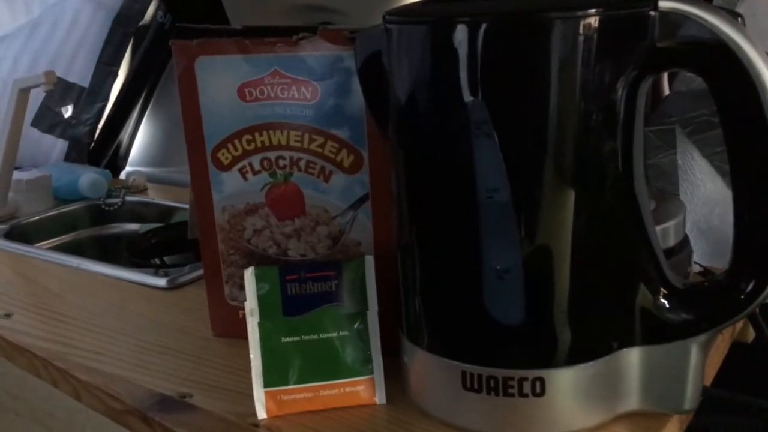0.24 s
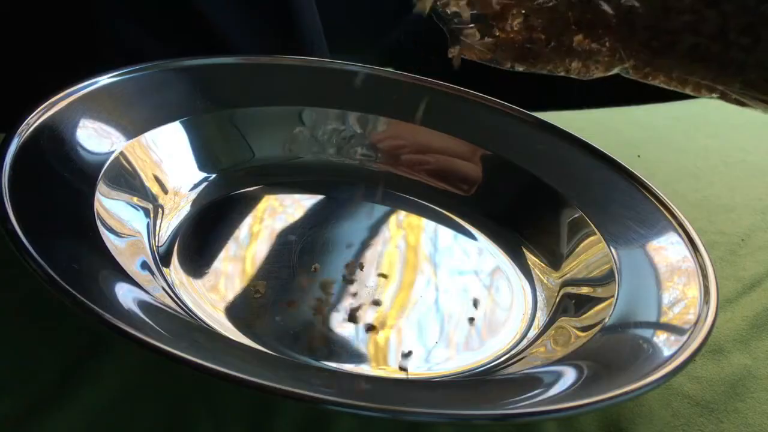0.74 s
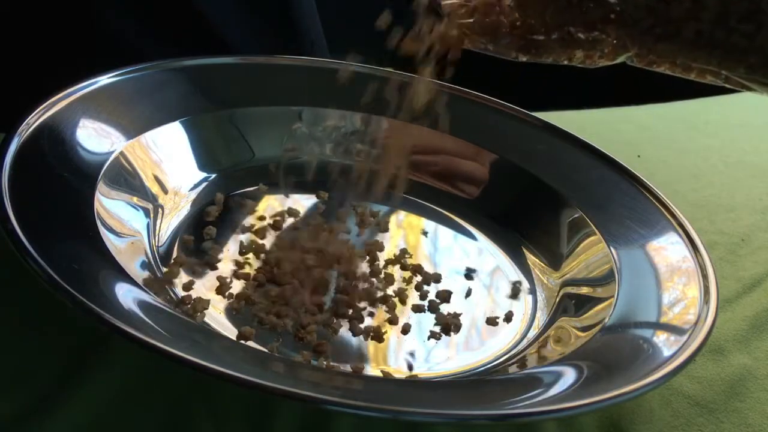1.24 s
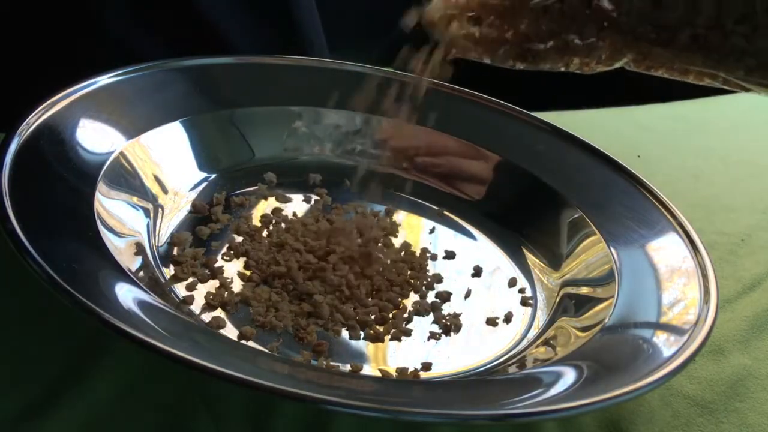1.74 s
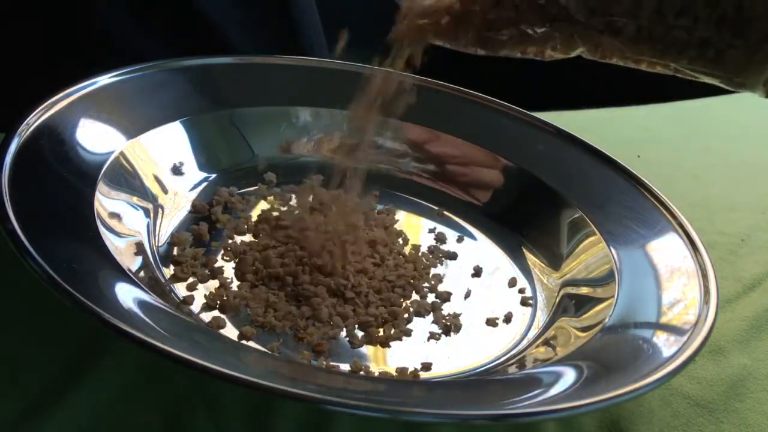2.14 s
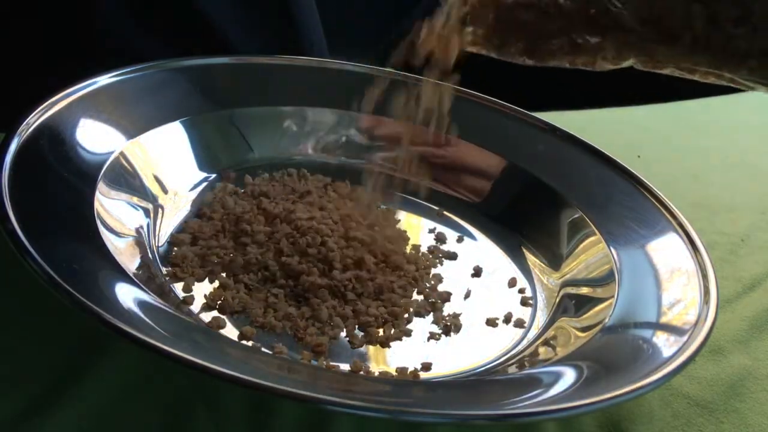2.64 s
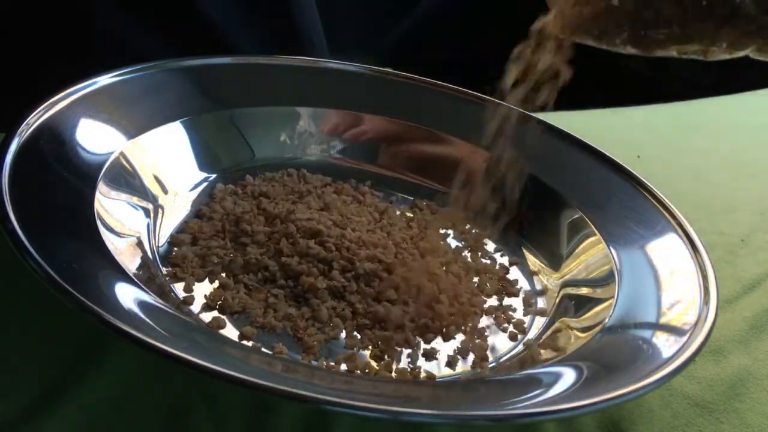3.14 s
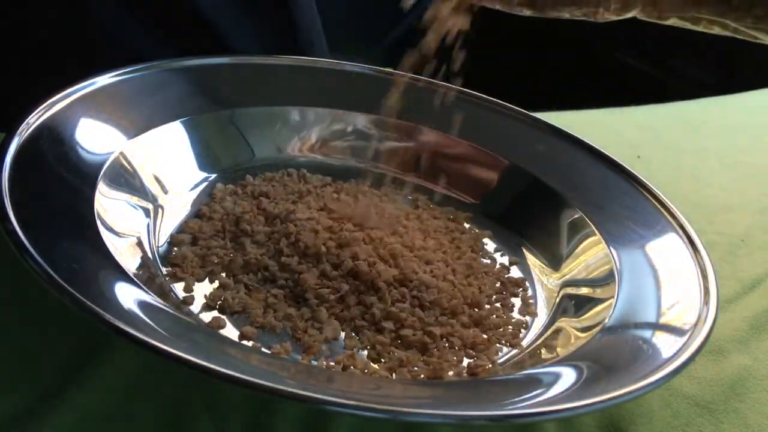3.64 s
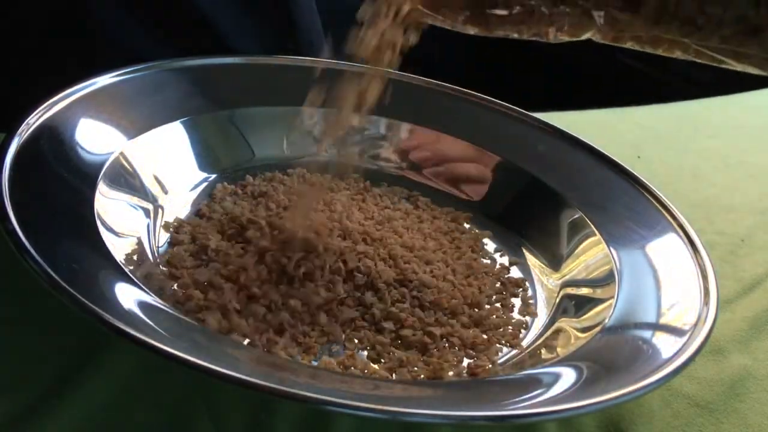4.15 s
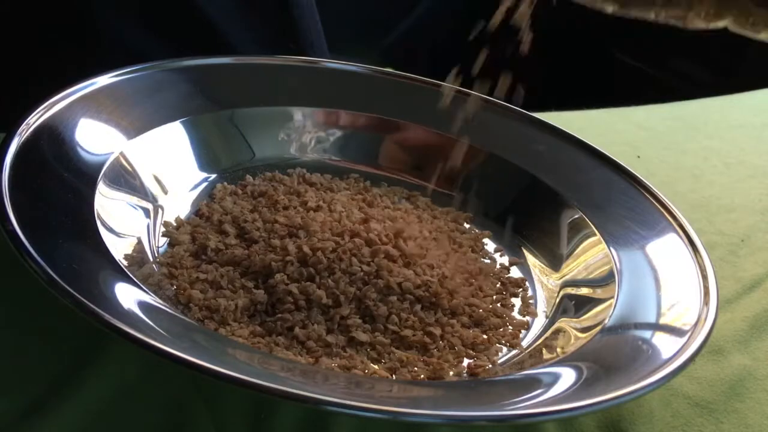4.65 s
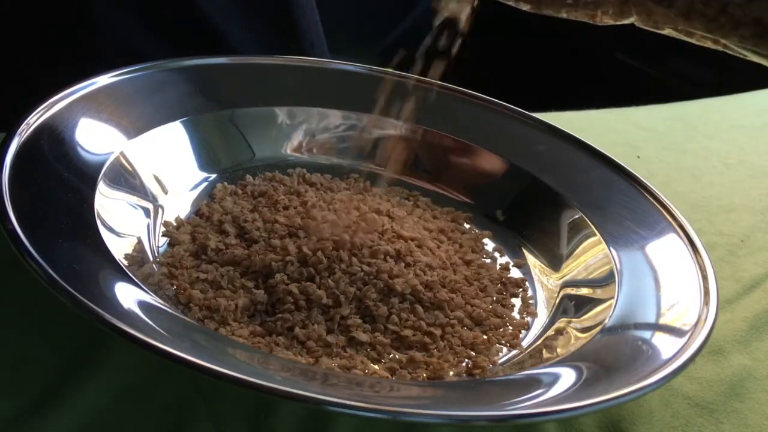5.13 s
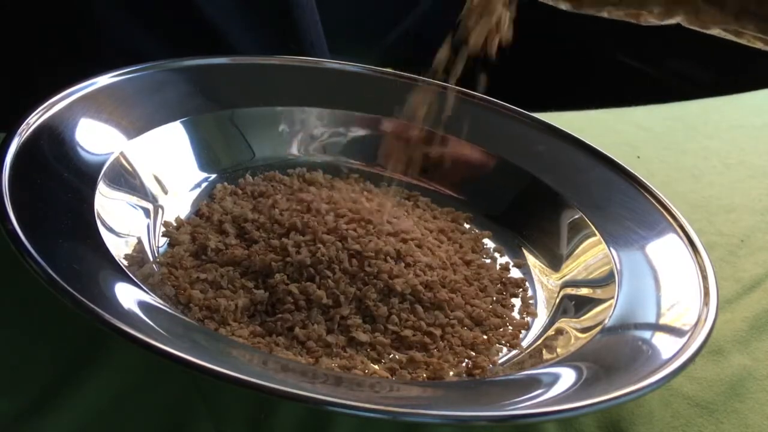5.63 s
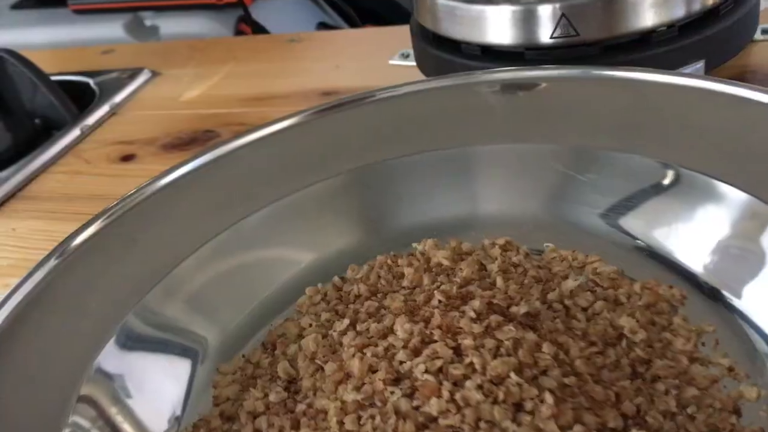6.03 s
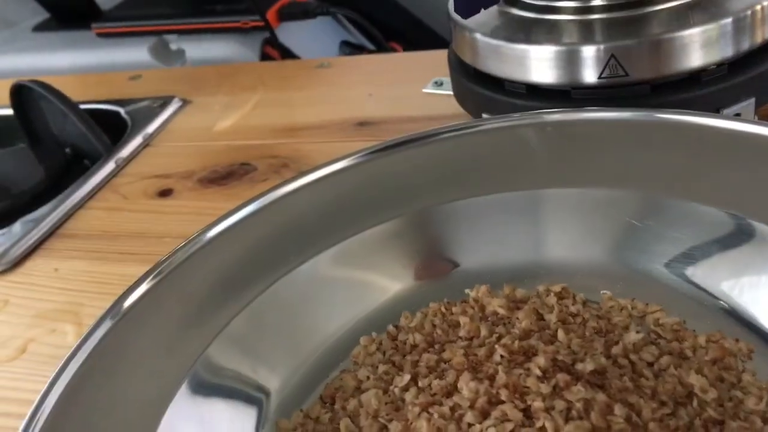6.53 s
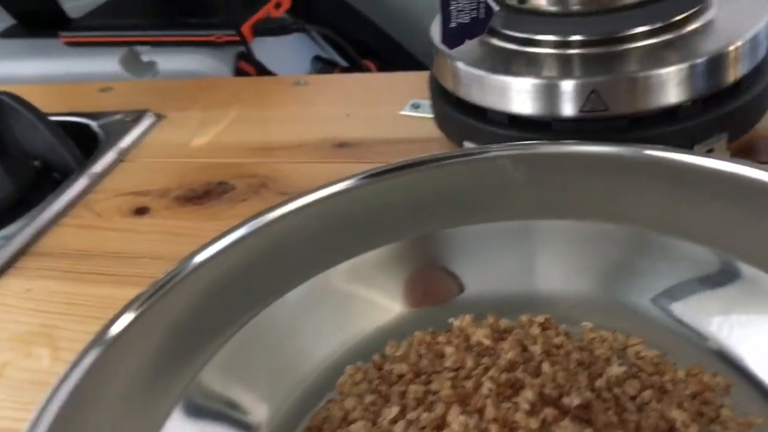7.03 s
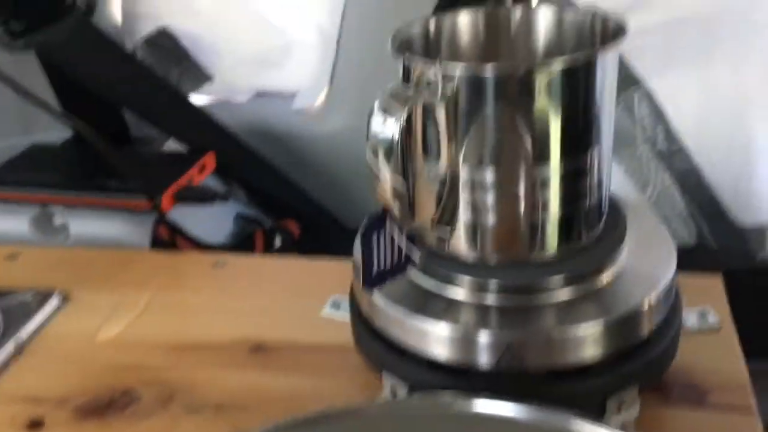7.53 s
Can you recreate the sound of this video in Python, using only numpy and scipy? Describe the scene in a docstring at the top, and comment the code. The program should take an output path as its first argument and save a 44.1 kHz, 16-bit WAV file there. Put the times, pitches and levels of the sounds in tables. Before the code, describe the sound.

In a small cramped room, an electric kettle rumbles low for under a second. A hard cut brings dry flakes pouring from a crackling plastic bag, close to the microphone: bright, tinny ringing on bare steel at first, then a duller patter as the heap grows, uneven and clumpy, thinning towards the end. Another cut leaves a faint hush with a few soft knocks and clicks on a wooden worktop.

```python
"""Buckwheat flakes in a camper galley

Three shots in a small galley, split by cuts. An electric kettle rumbles on the wooden worktop: coloured noise,
ringing body modes and a wavering drone. Flakes pour from a crackling plastic bag onto a steel plate: dense
random grains patter on the heap and ring the plate's modes until the heap covers it. Then the room is quiet
but for light handling knocks and clicks: noise bursts over decaying wood and board modes."""
import sys
import numpy as np
from scipy import signal
from scipy.fft import rfft, irfft
from scipy.io import wavfile
from scipy.ndimage import uniform_filter1d

SR = 44100
rng = np.random.default_rng(int(sys.argv[2]) if len(sys.argv) > 2 else 0)


def store_wav(level_fs):
    """Save 16-bit WAV to argv[1]."""
    pcm = np.round(np.clip(np.atleast_2d(level_fs), -1, 1) * 32767)
    wavfile.write(sys.argv[1], SR, pcm.T.astype(np.int16))


N = 343098
TIME = np.arange(N) / SR
RING_TIME = TIME[:SR // 4]
# where the shots begin and end (s)
KETTLE_END, POUR_START, POUR_END = 0.709, 0.742, 6.007


# how freely the flakes run from the bag, as the nominal level of their patter: time_s, level_db
FLOW = [(.74, -59), (.76, -44.5), (1.2, -40), (1.56, -44), (2.07, -42), (2.66, -44.5), (2.79, -41.5),
        (3.6, -46.5), (3.65, -52), (3.745, -43.5), (4.03, -46), (4.1, -42.5), (4.66, -51.5), (4.97, -51.5),
        (5.19, -46), (5.47, -53.5), (5.66, -50.5), (6.0, -55)]
# share of the stream that lands on bare steel as heap and hand move: time_s, share (0-1)
BARE_STEEL = [(.76, .72), (1.5, .96), (1.8, .3), (2.5, .44), (3.22, .44), (3.7, .08), (4.28, .21),
              (4.71, .01), (6.0, .1)]
# colour of flakes on the heap: pitch_hz, relative level_db (per Hz)
PATTER_COLOUR = [(200, -19.5), (370, -9), (470, -10), (570, -7), (690, -3.5), (890, -7.5), (1050, -2.5),
                 (1300, -5.5), (1820, -6.5), (2080, -1.5), (2680, 0), (3650, -2), (4290, -4.5),
                 (4900, -10.5), (6400, -33.5)]
# colour of their bright ticks on the heap: pitch_hz, relative level_db (per Hz)
TICK_COLOUR = [(4900, -13), (5500, -2), (6400, 0), (7400, -3), (8600, -1), (10400, -4), (12400, -1),
               (14000, 1), (15700, -2.5)]
# low notes of the whole dish flexing: pitch_hz, t60_s, level_db (over the push of the flakes)
DISH_MODES = [(328, 0.07, -21), (720, 0.03, -14.5)]
# flakes per s at a flow of FULL_FLOW_DB; the count doubles with every DOUBLING_DB
FLAKES_PER_S, FULL_FLOW_DB, DOUBLING_DB = 2900, -43, 21.5
# ticking over patter on the heap, and what a fully bare plate adds to it
TICK_DB, STEEL_TICK_DB = 1.74, 7.5
STREAM_FLUTTER_DB = 1.5  # quick random unevenness of the stream
SKITTER_BARE = 0.48  # from this share of bare steel on, a clump only skitters and adds no patter


def flakes():
    """Flakes land in clumps: on the heap they patter and tick dryly, on bare steel they ring the plate."""
    flow_db, = curves(FLOW)
    bare, = curves(BARE_STEEL)
    swell_db = clumps()
    rate = FLAKES_PER_S * 2 ** ((flow_db - FULL_FLOW_DB) / DOUBLING_DB)
    stream = undb(STREAM_FLUTTER_DB * walk(55))
    landing = impacts(rate, scatter_db=6.0, contact_s=0.0014)

    def grains(low_hz, high_hz, contact_s):
        """Whole flakes sound at every pitch; rebounds and crumbs only at the pitch of their own size."""
        own = impacts(rate / 2, scatter_db=6.0, contact_s=contact_s)
        envelope = stream * np.hypot(0.7 * landing, 0.69 * own)
        return band(envelope * rng.standard_normal(N), low_hz, high_hz)

    patter = undb(flow_db + swell_db * np.maximum(1 - bare / SKITTER_BARE, 0))
    tick = undb(flow_db + swell_db + TICK_DB + STEEL_TICK_DB * bare)

    coarse = grains(100, 1580, contact_s=0.0019) + grains(1460, 7000, contact_s=0.0022)
    fine = grains(4500, 9460, contact_s=0.0005) + grains(9500, 19000, contact_s=0.00045)
    heap = through(coarse * patter, colour(PATTER_COLOUR))
    heap += through(fine * tick * np.sqrt(1 - bare), colour(TICK_COLOUR))

    poured = np.cumsum(undb(flow_db) ** 2 * shot(POUR_START, POUR_END))
    heap_size = poured / poured[-1]
    # each landing spot wakes other modes of the steel
    steel_level = tick * np.sqrt(bare)
    blows = grains(1300, 19000, contact_s=0.00036) * steel_level
    other_blows = grains(1300, 19000, contact_s=0.00036) * steel_level
    steel = plate(blows, other_blows, heap_size)

    push = grains(150, 1500, contact_s=0.001) * patter * bare
    dish = sum(undb(db) * through(push, mode(hz, t60)) for hz, t60, db in DISH_MODES)
    return heap + steel + dish


# clumps that slide out of the bag together: start_s, length_s, jump_db
CLUMPS = [(.778, 0.025, 10), (0.822, .01, 8.5), (.855, 0.01, 5), (0.935, 0.063, 5), (1.022, 0.046, 6),
          (1.126, .086, 5), (1.299, 0.1, 3.5), (1.572, 0.021, 5), (1.858, 0.014, 4.5), (2.011, 0.03, 4),
          (2.155, .04, 5.5), (2.366, 0.012, 7), (2.773, .05, 1), (2.923, 0.03, 7.5), (3.126, 0.047, 2.5),
          (3.23, 0.027, 5), (3.324, .025, 4.5), (3.523, 0.059, 3.5), (3.743, 0.037, 4.5), (4.117, .041, 4),
          (4.273, 0.078, 4.5), (4.42, 0.018, 4.5), (4.7, 0.054, 4), (4.771, 0.023, 8.5),
          (4.984, 0.019, 4.5), (5.129, 0.031, 7), (5.271, 0.038, 5.5), (5.372, 0.041, 4.5),
          (5.815, 0.053, 4.5), (5.932, .035, 5.5)]


def clumps():
    """Swell of the stream in dB: each clump arrives quickly, runs for its length and trickles out."""
    swell_db = np.zeros(N)
    for start, length, db in CLUMPS:
        attack = np.clip((TIME - start) / 0.0054, 0, 1)  # rise time in s
        release = np.exp(-np.clip((TIME - start - length) / 0.016, 0, 20))  # time constant in s
        swell_db += db * attack * release
    return swell_db


def impacts(rate, scatter_db, contact_s):
    """Envelope of many tiny impacts of unequal size, each dying away as contact ends; mean power near 1."""
    hit = rng.random(N) < rate / SR
    size_db = scatter_db * np.minimum(rng.standard_normal(N), 3)
    energy = hit * undb(size_db) ** 2
    power = signal.lfilter([1], [1, -np.exp(-2 / (contact_s * SR))], energy)
    return np.sqrt(power / (uniform_filter1d(power, SR // 14) + 1e-12))


# strong modes of the steel plate: pitch_hz, relative level_db
PLATE_MODES = [(2046, -11), (2638, -13), (2848, -12), (2929, -10), (3311, -11), (3639, -11), (3747, -11),
               (4048, -16), (4737, -18), (5529, -12), (5636, -8), (5706, -7), (5787, -12), (6422, -10),
               (6966, -7), (7305, -5), (7375, -8), (7440, -7), (7666, -6), (8263, -7), (8328, -4),
               (8952, -6), (9663, -9), (9744, -6), (10810, -2), (11493, -4), (13194, -2), (13259, -2),
               (14400, 0), (15655, -4)]
# colour of its countless weaker modes: pitch_hz, relative level_db (per Hz)
WEAK_COLOUR = [(2000, -28), (3800, -28), (5100, -22), (6200, -18), (7200, -10), (8600, 0.5),
               (10200, -5.5), (12300, 6.5), (13800, 2), (15700, -3.5)]
# share of the lower ring that the full heap takes away, and below which pitch
HEAP_DAMPING, HEAP_DAMP_HZ = 0.59, 8500


def plate(blows, other_blows, heap_size):
    """Thin steel rings in strong modes, weaker ones filling the gaps; the heap muffles the lower ones."""
    strong = sum(undb(db) * mode(hz, t60=0.085) * rng.choice([-1, 1]) for hz, db in PLATE_MODES)
    weak = through(burst(t60=0.021), colour(WEAK_COLOUR))
    ring = undb(-2.5) * through(blows, strong) + undb(-0.5) * through(other_blows, weak)
    lower = signal.sosfiltfilt(signal.butter(2, HEAP_DAMP_HZ, fs=SR, output="sos"), ring)
    return ring - HEAP_DAMPING * heap_size * lower


# the bag snaps: start_s, crack level_db, pitch_hz of the buckling film, pop level_db
SNAPS = [(0.7641, -32, 1510, -33.5), (1.3135, -23, 1890, -32), (1.4834, -19, 2670, -53),
         (1.9807, -37, 2040, -43), (2.0201, -21.5, 2000, -43), (2.0547, -23, 1800, -22.5),
         (2.1759, -28, 2670, -50), (2.5646, -22, 740, -22), (2.5978, -30, 2180, -56),
         (2.6918, -23.5, 1550, -30), (2.9073, -25.5, 1880, -54), (3.246, -27.5, 2160, -52),
         (3.7595, -24.5, 2210, -37), (3.9976, -31, 2550, -48), (4.1304, -21.5, 1500, -38),
         (4.6967, -28, 2480, -36), (4.8824, -22, 2500, -30.5), (5.0537, -37, 1920, -37.5),
         (5.1336, -32, 2730, -55), (5.8492, -38.5, 2780, -39.5)]


def bag():
    """Creases in the stiff film buckle: a sharp crack and a pop of a few cycles."""
    out = np.zeros(N)
    for start, crack_db, hz, pop_db in SNAPS:
        crack_hiss = band(burst(t60=0.0069), 6000, 17200)
        crack = unit(mode(hz=11800, t60=0.00057)) + undb(3.5) * unit(crack_hiss)
        pop_noise = band(burst(t60=0.011), hz * 0.4, hz * 2.4)
        pop = unit(mode(hz, t60=7 / hz)) + undb(3) * unit(pop_noise)
        add(out, start, blow(crack, crack_db, first_s=0.0017))
        add(out, start, blow(band(pop, 510, 4600), pop_db, first_s=0.00089))
    return out


# colour of the kettle's rumble: pitch_hz, relative level_db (per Hz)
RUMBLE_COLOUR = [(40, -7), (75, -1.5), (110, -10), (160, -10.5), (225, -12), (300, -19.5), (380, -34),
                 (900, -44), (1700, -46), (3500, -51.5), (5500, -59), (7200, -55.5), (10300, -61),
                 (12500, -59), (15500, -60)]
# course of the rumble, before a fixed 2.5 dB lift: time_s, level_db
RUMBLE_LEVEL = [(0, -43.5), (.14, -47), (.37, -43.5), (.7, -46)]
# the kettle's body, ringing faintly and steadily: pitch_hz, t60_s, level_db
BODY_MODES = [(547, 0.035, -80), (694, 0.028, -70.5), (860, 0.046, -73), (1045, .06, -81), (1465, .05, -76)]
# the worktop's drone, which swells with the rumble: pitch_hz, width_hz of its waver, mean level_db
DRONE = [(27.3, 2.1, -56), (55.2, 4.4, -40)]
DRONE_FLUTTER_DB = 1.7


def kettle():
    """Heating water rumbles and rings the kettle's body; the worktop drones with it at a wavering pitch."""
    level_db, = curves(RUMBLE_LEVEL)
    out = undb(level_db + 2.5) * noise(RUMBLE_COLOUR)
    body = sum(undb(db) * unit(mode(hz, t60)) for hz, t60, db in BODY_MODES)
    out += signal.fftconvolve(rng.standard_normal(N), body)[:N]
    swell_db = level_db - level_db[:SR // 2].mean()
    for hz, width, db in DRONE:
        phase = 2 * np.pi * np.cumsum(hz + width / 2 * walk(17)) / SR
        drone_db = db + swell_db + DRONE_FLUTTER_DB * walk(11.3)
        out += np.sqrt(2) * undb(drone_db) * np.sin(phase)
    return out


# handling knocks: start_s, thump pitch_hz, thump level_db, click level_db, hardness_db (treble over click)
KNOCKS = [(6.29, 217, -64.5, -85, -2), (6.4482, 140, -67, -77.5, 14), (6.4635, 150, -71, -63.5, 5.5),
          (6.62, 220, -56, -76.5, 9), (6.65, 230, -68, -63, -6), (6.693, 169, -58, -66.5, -6),
          (6.8396, 199, -55, -61, -18), (6.942, 207, -67, -81, -3), (7.0254, 190, -52.5, -61.5, -15),
          (7.176, 191, -53.5, -82, 4), (7.2147, 180, -34.5, -42.5, -0.5), (7.2416, 190, -47, -57, -6),
          (7.268, 129, -51, -54.5, -13), (7.283, 111, -49.5, -63, -11), (7.345, 186, -42, -68, -1),
          (7.366, 194, -48, -67, -8), (7.481, 136, -50.5, -72.5, -7), (7.505, 151, -54, -76, -5),
          (7.558, 135, -61, -76, 8)]
# colour of a knock's click: pitch_hz, relative level_db (per Hz)
CLICK_COLOUR = [(900, -18), (1320, 4.5), (1550, 0), (1780, 2), (2100, -4), (2600, -2.5), (2900, -4.5),
                (3500, -8.5), (5000, -14)]
# modes of the wooden worktop, before a random detuning: pitch_hz, relative level_db, t60_s
WOOD_MODES = [(345, -12.5, .06), (435, -10, 0.045), (547, -2.5, 0.033), (590, -8, 0.039), (732, -2, 0.039),
              (846, -3.5, 0.031), (990, -10, 0.033)]
# the clack lies midway between thump and click, plus CLACK_DB;
# it gains CLACK_GROWTH dB per dB of thump over a firm knock, so light knocks hardly wake it
CLACK_DB, CLACK_GROWTH, FIRM_KNOCK_DB = -2, 0.29, -50


def knocks():
    """Things touch the worktop: a click, a woody clack, then the slower thump of the board."""
    out = np.zeros(N)
    click_ring = colour(CLICK_COLOUR, size=1024)
    for start, hz, thump_db, click_db, hardness_db in KNOCKS:
        click = through(burst(t60=0.035), click_ring)
        treble = band(burst(t60=0.032), 4200, 16700)

        wood = np.zeros(len(RING_TIME))
        for wood_hz, db, t60 in WOOD_MODES:
            detuned_hz = wood_hz * (1 + 0.042 * rng.standard_normal())
            wood += undb(db) * mode(detuned_hz, t60) * rng.choice([-1, 1])
        wood_noise = band(burst(t60=0.063), 475, 900)
        clack = (unit(wood) + undb(-3.5) * unit(wood_noise)) * (1 - fade(t60=0.0059))
        clack_db = (thump_db + click_db) / 2 + CLACK_DB + CLACK_GROWTH * (thump_db - FIRM_KNOCK_DB)

        board = unit(mode(hz, t60=0.088)) + undb(-8) * unit(mode(hz=82.6, t60=0.23))
        board += undb(-4.5) * unit(band(burst(t60=0.18), 72, 282))
        # the heavy board takes a few cycles to get moving
        thump = band(board * (1 - fade(t60=0.02)), 35, 370)

        add(out, start, blow(thump, thump_db, first_s=0.037))
        add(out, start, blow(clack, clack_db, first_s=0.014))
        add(out, start, blow(click, click_db, first_s=0.014))
        add(out, start, blow(treble, click_db + hardness_db, first_s=0.013))
    return out


def cabin(x, wet_db, t60):
    """Direct sound at the microphone plus the short, dull reflections of a cramped room."""
    tail = unit(band(burst(t60), 300, 9100) * (RING_TIME > 0.003))
    return x + undb(wet_db) * through(x, tail)


def noise(points):
    """Steady noise of a given colour, rms 1."""
    return through(rng.standard_normal(N + SR), colour(points))[SR:]


def undb(db):
    """Decibels to gain."""
    return 10 ** (np.asarray(db) / 20)


def curves(table):
    """Each column after the time of a table of (time_s, ..) rows, at every sample."""
    s, *columns = np.transpose(table)
    return [np.interp(TIME, s, c) for c in columns]


def unit(response):
    """An impulse response scaled to pass white noise at unchanged level."""
    return response / np.sqrt(np.sum(response ** 2))


def through(x, response):
    """Sound passed through a unit impulse response."""
    return signal.fftconvolve(x, unit(response))[:len(x)]


def colour(points, size=8192):
    """Causal minimum-phase response through (pitch_hz, level_db) points, falling 20 dB per octave outside."""
    hz, db = np.transpose(points)
    f = np.maximum(np.fft.rfftfreq(size, 1 / SR), 1)
    octaves_outside = np.maximum(np.log2(hz[0] / f), 0) + np.maximum(np.log2(f / hz[-1]), 0)
    level_db = np.interp(np.log(f), np.log(hz), db) - 20 * octaves_outside
    cepstrum = irfft(np.log(undb(level_db)))
    # folding the cepstrum onto positive time makes the response causal
    cepstrum[1:size // 2] *= 2
    cepstrum[size // 2 + 1:] = 0
    return irfft(np.exp(rfft(cepstrum)))


def band(x, lo_hz, hi_hz):
    """Band-pass."""
    return signal.sosfilt(signal.butter(2, [lo_hz, hi_hz], "band", fs=SR, output="sos"), x)


def walk(rate):
    """Random levels held 1 / rate s and smoothed; spread 1."""
    k = max(int(SR / rate), 1)
    steps = np.repeat(rng.standard_normal(N // k + 1), k)
    y = uniform_filter1d(steps, k)[:N]
    return y / y.std()


def fade(t60):
    """Exponential decay, 60 dB in t60 s."""
    return np.exp(-np.log(1000) * RING_TIME / t60)


def mode(hz, t60):
    """One struck resonance: a decaying sine."""
    return np.sin(2 * np.pi * hz * RING_TIME) * fade(t60)


def burst(t60):
    """A dying burst of noise."""
    return rng.standard_normal(len(RING_TIME)) * fade(t60)


def blow(sound, db, first_s):
    """A hit whose first moments have the given rms level."""
    return sound * undb(db) / np.sqrt(np.mean(sound[:int(first_s * SR) + 1] ** 2))


def add(out, start, sound):
    """Mix a sound in at a time in s."""
    i = int(start * SR)
    out[i:i + len(sound)] += sound[:N - i]


def shot(start, end):
    """Gate open between two cuts, its edges smoothed over 2 ms."""
    return uniform_filter1d(((TIME >= start) & (TIME < end)) * 1.0, SR // 500)


# room tone under the pour: pitch_hz, relative level_db (per Hz)
POUR_ROOM_COLOUR = [(15, -32.5), (25, -21.5), (53, 2), (86, -2), (124, -2), (161, -6), (300, -18),
                    (390, -41.5), (660, -120)]
# room tone under the handling: pitch_hz, relative level_db (per Hz)
QUIET_ROOM_COLOUR = [(15, -31), (25, -8), (78, -4), (129, -24), (189, -14), (268, -27), (472, -32),
                     (4080, -41.5), (4670, -43), (5060, -41), (7580, -41), (8220, -38.5), (9200, -37),
                     (10500, -41.5), (12600, -37.8), (15700, -37.5)]
POUR_ROOM_DB, QUIET_ROOM_DB = -66.5, -62


def scene():
    """The three shots, one after the other; steady room tone lies under the pour and the handling."""
    pouring = cabin(flakes() + bag(), wet_db=-18.5, t60=0.084)
    pouring += undb(POUR_ROOM_DB) * noise(POUR_ROOM_COLOUR)
    handling = cabin(knocks(), wet_db=-13.0, t60=0.061)
    handling += undb(QUIET_ROOM_DB) * noise(QUIET_ROOM_COLOUR)
    out = kettle() * shot(0, KETTLE_END)
    out += pouring * shot(POUR_START, POUR_END)
    out += handling * shot(POUR_END, np.inf)
    return out[None]


def record(dry):
    """The recorder cuts the top steeply above 15750 Hz."""
    return signal.sosfilt(signal.ellip(10, 0.2, 80, 15750, fs=SR, output="sos"), dry)


dry = scene()
out = record(dry)
store_wav(out)
```